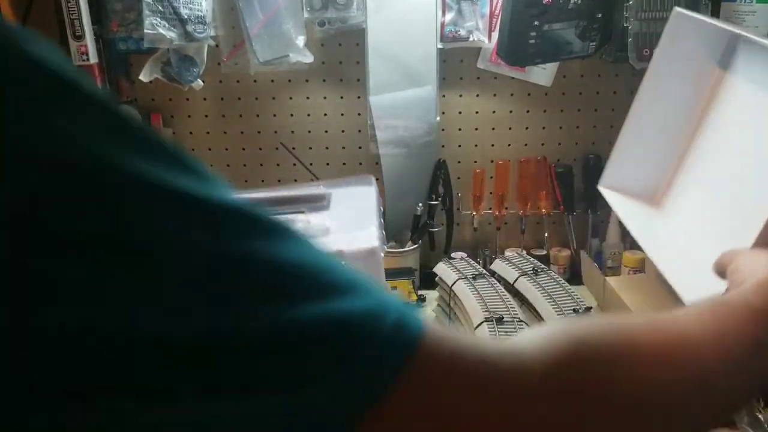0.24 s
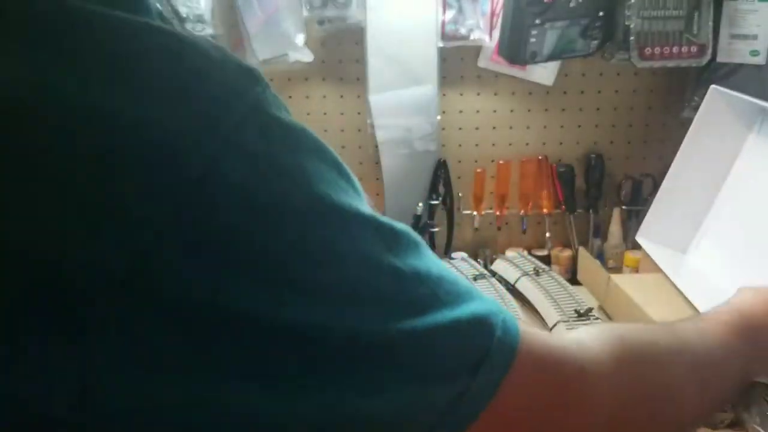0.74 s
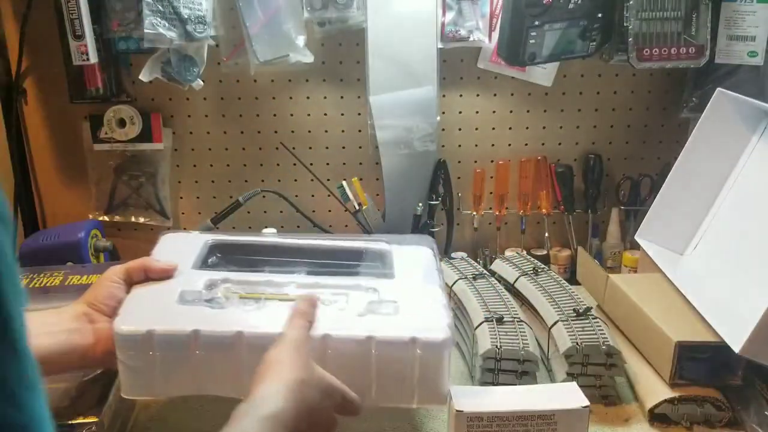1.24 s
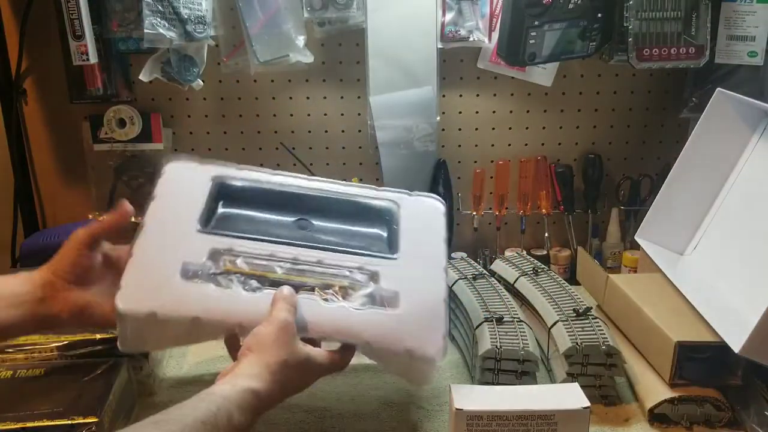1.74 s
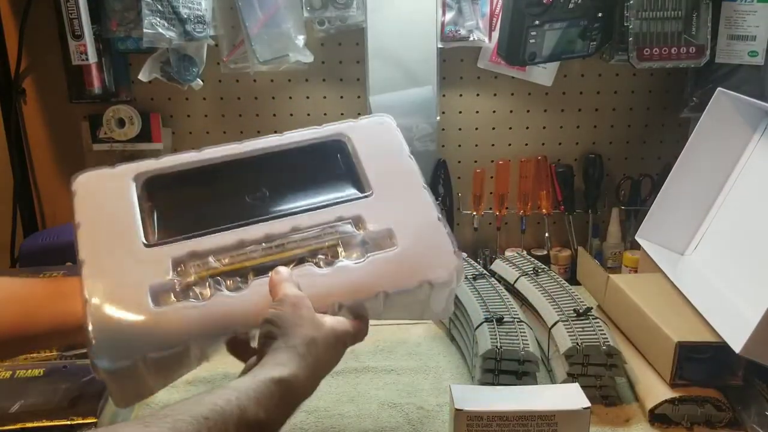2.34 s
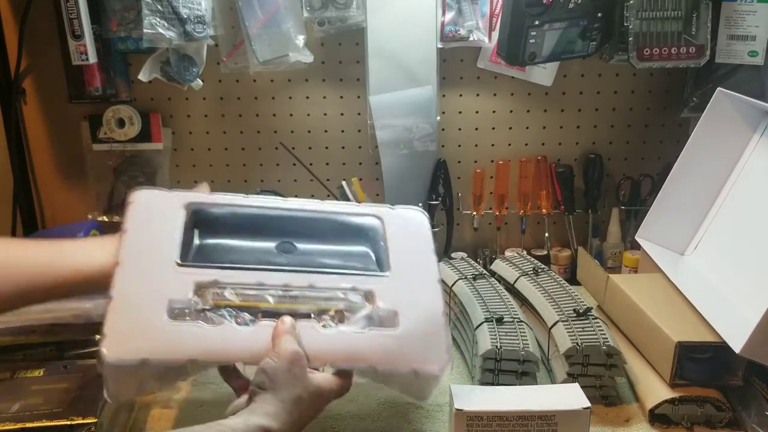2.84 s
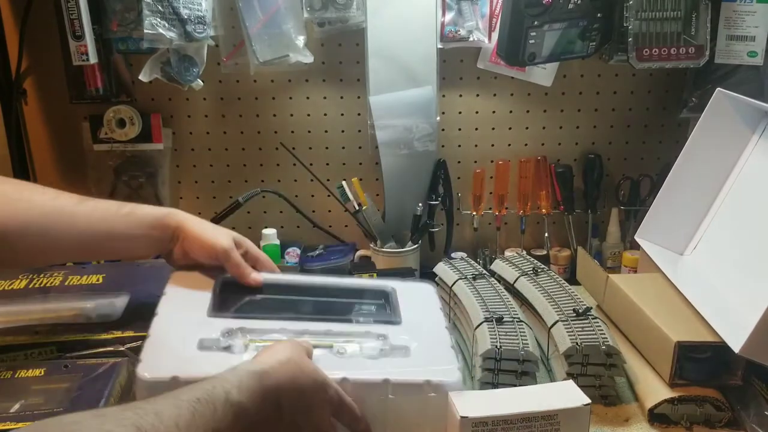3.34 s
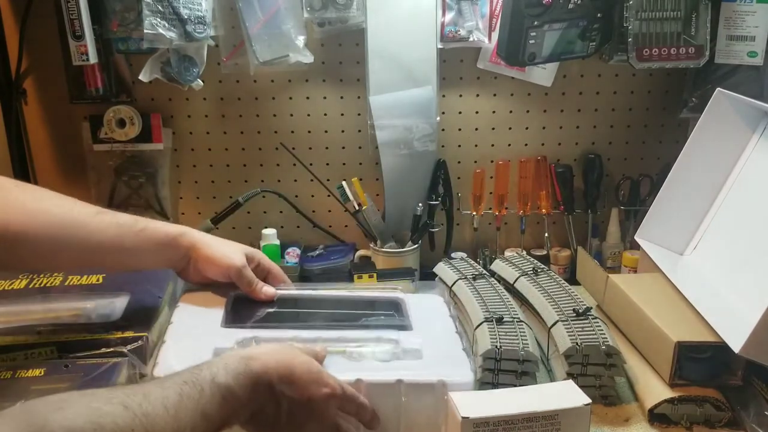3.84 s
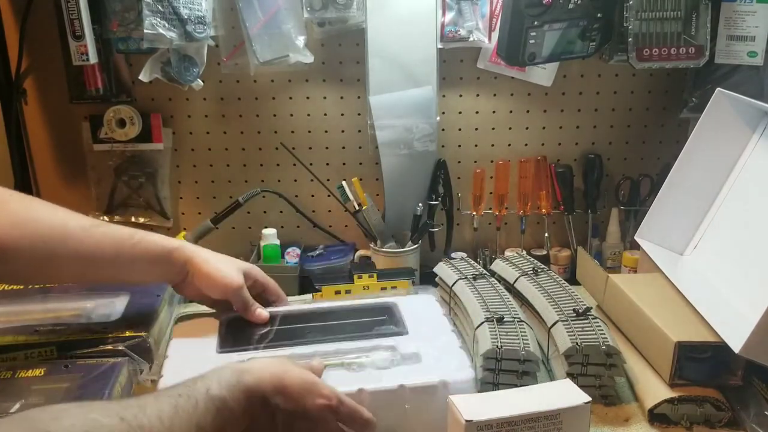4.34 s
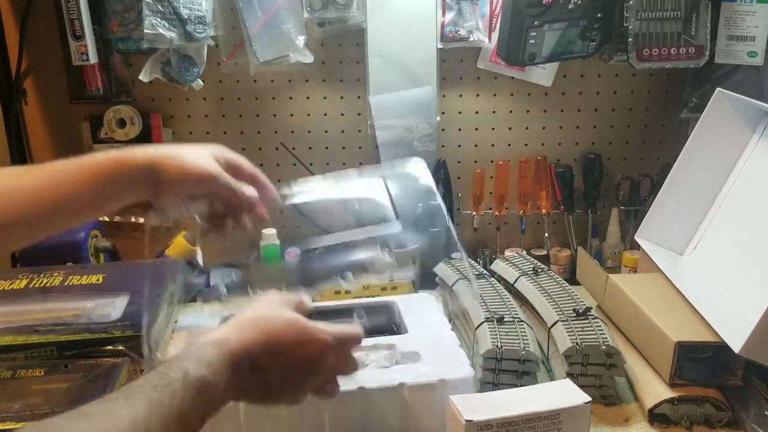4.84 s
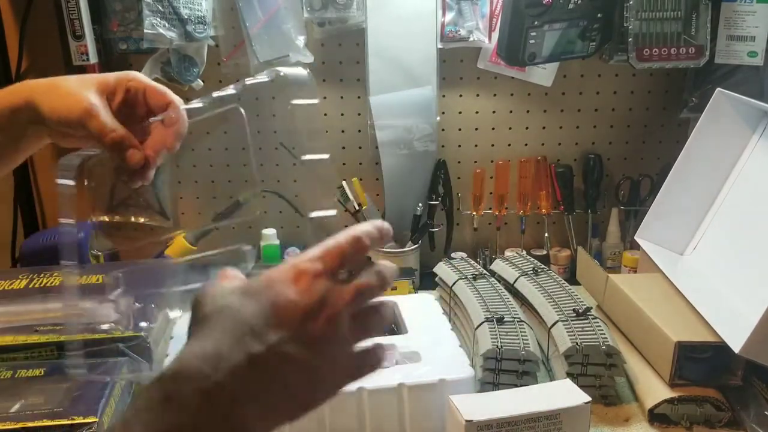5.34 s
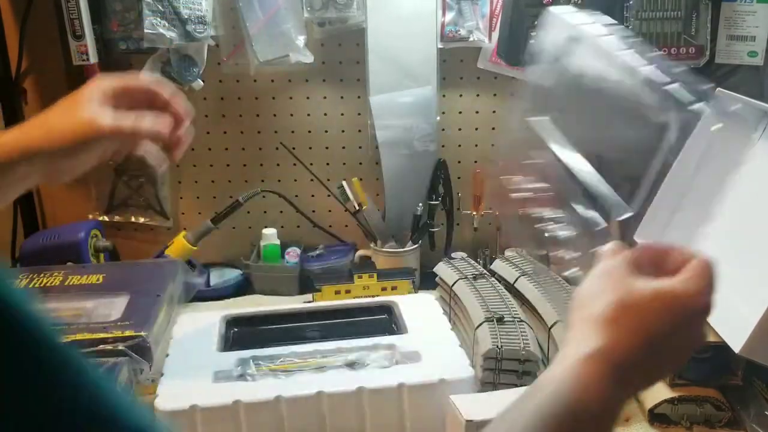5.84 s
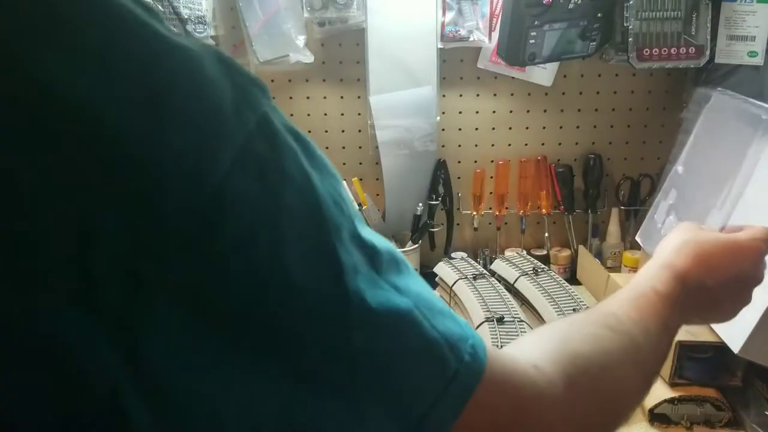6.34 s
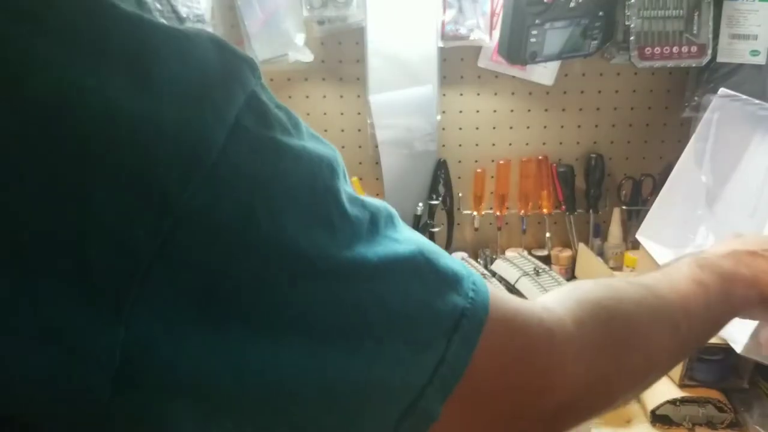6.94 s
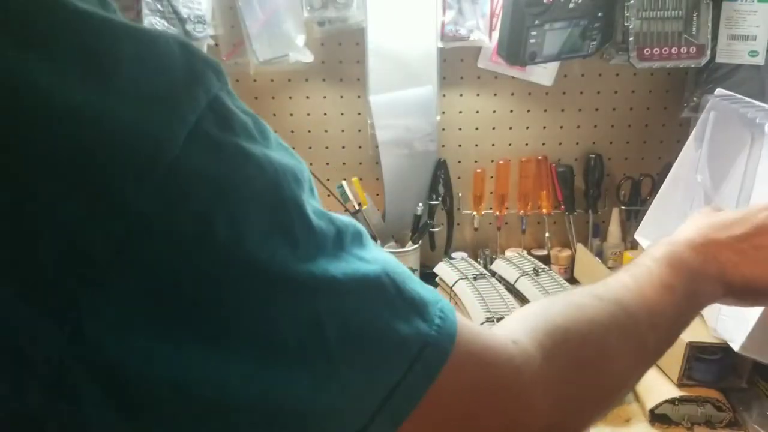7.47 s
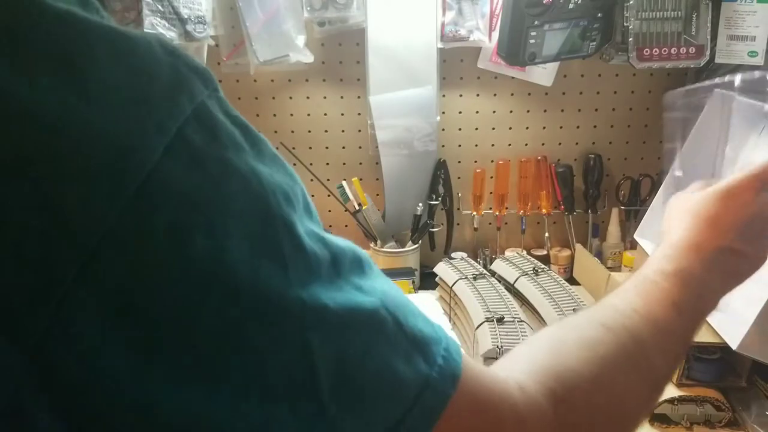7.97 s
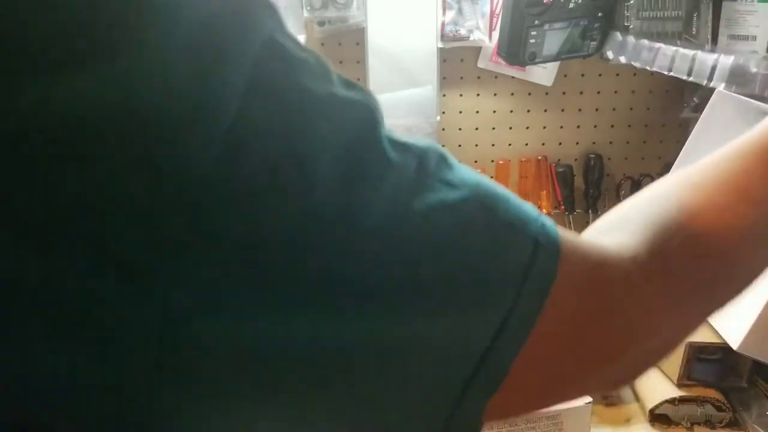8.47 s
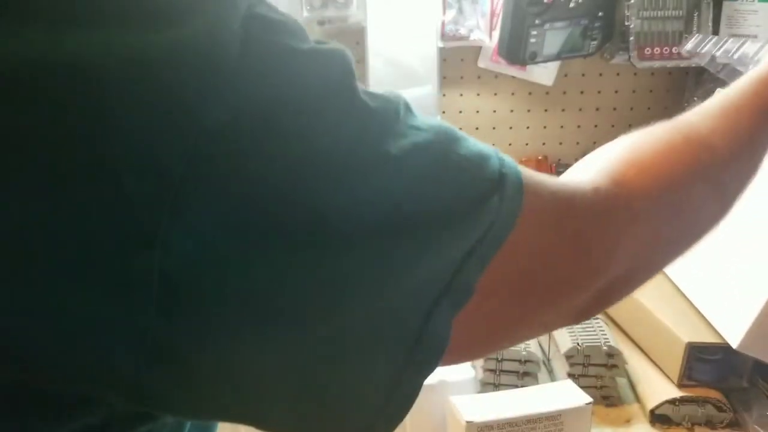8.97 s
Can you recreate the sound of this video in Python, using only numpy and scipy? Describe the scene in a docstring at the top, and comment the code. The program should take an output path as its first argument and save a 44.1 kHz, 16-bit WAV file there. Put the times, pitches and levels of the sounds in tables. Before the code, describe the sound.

A small workshop with steady low ventilation, faint hiss and motor hum, heard by two close microphones. Around 0.4-0.8 s come light plastic ticks, small knocks and a soft rub. Sparse clicks and scuffs follow from 1.2 s, with a loud, sharp plastic crack at about 1.9 s, then quiet handling. From 3.1 to 4.3 s foam and plastic rub in short strokes with clustered snaps, hollow bumps and a short lid ring near 3.5 s. A faint flick at 4.75 s precedes pops at 4.95 and crisp flexing at 5.4-5.5 s. At 6.1-6.9 s the sheet scrapes and pops with a box knock; it is nearly quiet until 7.7 s. Dense bright crackling with a tiny high squeak peaks at 7.8-8.05 s. From 8.45 s cardboard knocks dominate, heaviest at 8.6 s, with rubs, small squeaks near 9 s and final taps. Each sound gets a short echo.

```python
"""A small workshop with a low steady hum, where each handling sound gets a short echo.
On a bench, hands work the thin plastic lid off a foam tray and stow it in a cardboard box.
Sliding foam, plastic and sleeve are streams of tiny slips; squeaks are short unsteady tones.
Tray and box knock as decaying modes, the freed lid rings, and snaps are filtered noise flurries.
Two close microphones share the bass and differ in the treble."""
import sys
import numpy as np
from scipy import signal
from scipy.fft import rfft, irfft
from scipy.io import wavfile
from scipy.ndimage import uniform_filter1d, map_coordinates

SR = 44100
rng = np.random.default_rng(int(sys.argv[2]) if len(sys.argv) > 2 else 0)


def transcribe(signal):
    """Save signal, clipped to [-1, 1], as a 16-bit WAV file at the path in sys.argv[1]."""
    frames = np.atleast_2d(signal).T
    limited = np.clip(frames, -1, 1)
    pcm = np.round(limited * 32767).astype(np.int16)
    wavfile.write(sys.argv[1], SR, pcm)


N = 406161

# steady ventilation noise, spectral shape: f/Hz, relative density/dB
AIR_COLOUR = [(20, -27), (35, -5.5), (54, -2.5), (85, -8.5), (120, -6), (180, -5), (215, -12), (260, -11),
              (330, -14), (490, -16.5), (680, -25), (1000, -35), (5000, -42), (15500, -44)]
# hum of a motor in the room: f/Hz, rms level/dB
MOTOR_HUM = [(120, -68), (257, -80), (486, -73)]
# decay of the workshop: f/Hz, t60/s
ROOM_DECAY = [(100, 0.53), (320, 0.25), (840, 0.21), (2200, 0.23), (5800, 0.21), (14000, 0.19)]
# colour of the microphone pair: f/Hz, left minus right/dB
MIC_BALANCE = [(100, 1.3), (500, 4), (1200, 1.5), (2500, 5), (4500, 1), (7500, -5.5), (14000, -4)]
# stereo width: f/Hz, gain of the difference signal/dB
MIC_WIDTH = [(120, -15), (250, -12), (500, -6.5), (1000, -2), (2000, 0.5), (15000, 2.5)]
# where the hands work, box on the right or tray in the middle: t/s, delay of the left microphone/ms
HAND_PLACE = [(0.9, 0.2), (1.2, -0.047), (5.7, -0.074), (6.5, .14), (8.1, 0.15), (8.5, 0.17)]
# how the thin shell radiates: f/Hz, level/dB
SHELL_COLOUR = [(100, -35.5), (250, -9.5), (330, -7.5), (450, -2.5), (650, -5.5), (950, -7.5), (1500, -4),
                (2400, -4.5), (3400, -3), (5000, -10), (7000, -14.5), (8700, -24.5), (11500, -17.5),
                (15500, -23)]
# resonances of the tray's air pockets and walls: f/Hz, width/Hz, level/dB
TRAY_POCKETS = [(455.6, 17, 7.5), (555, 60, 1), (825, 13, 4.5), (1581, 82, 0), (2050, 210, -0.5),
                (2860, 260, 2), (3420, 80, 1)]
# colour of sliding foam and plastic: f/Hz, level/dB
SCUFF_COLOUR = [(300, -7.5), (800, -16), (1300, 3), (2500, 0.5), (3700, -1.5), (5000, -5), (7000, -9.5),
                (8700, -20), (11500, -11.5), (15500, -15.5)]
# colour of the hollow body under a stroke: f/Hz, level/dB
HOLLOW_COLOUR = [(60, -19.5), (170, 2.5), (300, -9.5), (450, -4), (800, -8), (1200, -12), (2500, -49.5),
                 (8000, -64.5)]
# strokes of lid, foam and sleeve, levels before the layer trims: t/s, held/s, scuff/dB, hollow body/dB
SLIDE_STROKES = [(0, 0.008, -59.5, -61.5), (0.462, 0.014, -53.5, -41.5), (0.53, 0.34, -73, -55),
                 (1.265, 0.14, -56, -54.5), (1.52, 0.11, -69.5, -65), (1.71, 0.33, -54.5, -56.5),
                 (2.02, 0.068, -75, -55.5), (2.12, 0.18, -64, -59.5), (2.44, 0.11, -64.5, -60),
                 (2.694, 0.019, -64, -57), (2.85, 0.16, -58.5, -55), (3.091, 0.48, -54, -49),
                 (3.157, 0.0089, -43, -45), (3.359, 0.013, -54, -43), (3.445, 0.019, -45, -36.5),
                 (3.56, .15, -54, -49.5), (3.848, 0.13, -45.5, -46.5), (4.01, 0.21, -70, -57),
                 (4.243, 0.057, -43.5, -37.5), (4.35, 0.1, -60, -53.5), (4.52, 0.24, -68, -58.5),
                 (4.88, 0.051, -63, -88), (5.018, 0.083, -55.5, -58.5), (5.408, 0.0093, -36, -48),
                 (5.489, 0.072, -49, -57), (6.12, 0.16, -59, -49.5), (6.319, 0.023, -46.5, -48),
                 (6.44, 0.22, -58.5, -53), (6.643, 0.018, -39.5, -40.5), (6.68, 0.091, -43.5, -45.5),
                 (6.82, 0.052, -57, -62), (6.94, 0.13, -63.5, -55.5), (7.727, 0.085, -56.5, -53.5),
                 (7.804, 0.015, -40, -37), (7.917, 0.044, -45, -41), (8.009, 0.059, -57, -43.5),
                 (8.491, 0.051, -51.5, -54), (8.62, .33, -56.5, -57), (8.88, 0.01, -51.5, -46.5),
                 (9.03, 0.076, -51.5, -45), (9.19, .02, -54, -45)]
# plastic sticking and slipping on plastic: t/s, rms level/dB, mean pitch f/Hz, length/ms
SQUEAK_EVENTS = [(7.055, -71.5, 8420, 27), (7.166, -71.5, 5850, 20), (7.901, -37, 8340, 8.6),
                 (8.96, -49, 5700, 7), (9.005, -54, 6060, 21)]
# modes of the box on the bench: f/Hz before the grip detunes them, level/dB, t60/s
BOX_MODES = [(96.5, -3.5, 0.21), (130, -11, 0.32), (175.7, -0.5, 0.16), (203, -1, 0.16), (266, -7, 0.13),
             (308, -7, 0.34), (355.8, -2, 0.072), (404, -12.5, 0.09), (500, -5.5, 0.1), (683, -2, 0.13),
             (787, -7, 0.079)]
# knocks of tray and box: t/s, energy before trim/dB, contact before softness scaling/ms, struck wall f/Hz
KNOCK_EVENTS = [(0.455, -13.5, 0.4, 319), (0.496, -14.5, 2.7, 272), (0.515, -15.5, 6, 131),
                (0.579, -21, 1.5, 285), (3.461, -16, 7.2, 107), (4.264, -9, 7.1, 58), (4.268, -5, 3.7, 197),
                (4.292, -14, 1.2, 177), (4.733, -22, 3.2, 179), (4.958, -14, 1.5, 219),
                (5.063, -22.5, 5.6, 159), (5.415, -19.5, 4, 187), (5.449, -13, 2.9, 69.4),
                (5.51, -11, 0.4, 368), (6.437, -2, 3.5, 239), (6.858, -12.5, 2.1, 239),
                (6.962, -18, 2.1, 173), (7.833, -16, 1.2, 315), (7.932, -16.5, 1.3, 170),
                (8.019, -12, 0.9, 473), (8.465, -10.5, 1.3, 296), (8.523, -8.5, 0.55, 256),
                (8.598, 9.5, 3, 151), (8.75, -5, 1.9, 167), (8.833, -3, 3.2, 308), (8.837, -6, 12, 68),
                (8.922, -10.5, 1.2, 372), (9.031, -7, 1.2, 152), (9.117, -11.5, 2, 161.8),
                (9.161, -7.5, 2.8, 313), (9.194, -9.5, 2, 234)]
# modes of the free lid: f/Hz, level before the contact mutes it/dB, t60/s
LID_MODES = [(1468, 15, 0.054), (1570, 14, 0.049), (2506, 10, 0.0922), (2700, -2.5, 0.09),
             (4940, 7.5, 0.055)]
# flicks of the freed lid: t/s, energy/dB, contact/ms
FLICK_EVENTS = [(3.461, -8, 1.5), (4.7511, -21, 0.14)]
# how far the panel that gave way stands out, weakest around 3 kHz: f/Hz, peak/dB
PANEL_PEAK = [(450, 9.5), (1500, 13), (3000, 6), (6000, 12)]
# snaps of lid and tray: t/s, 1-6 kHz energy before trim/dB, hollow body tilt/dB, crisp top tilt/dB,
# ringing panel f/Hz, length (half the time the main burst's shape takes to fall to 1/e)/ms
SNAP_EVENTS = [(0.439, -26, 10, 10, 406, 2.5), (0.4924, -18, 0.5, 3, 850, 1.8),
               (0.5143, -15.5, 2, 2, 4100, 1.9), (0.5528, -13.5, 6.5, -11, 2700, 6.8),
               (0.6201, -22.5, -21, 1.5, 6140, 1.1), (0.6573, -15.5, -5, 12, 5210, 2),
               (0.684, -20.5, -22, 14.5, 6200, 2), (0.7812, -21, 7, -28, 1330, 2.8),
               (1.033, -42, 16, -12, 2180, 4.3), (1.2484, -24, 15, -21, 1320, 1.7),
               (1.325, -23.5, 5, 15.5, 13600, 2.7), (1.386, -18, 13, -1, 1400, 4.6),
               (1.4637, -18, 6, -5, 477, 4.7), (1.6741, -15.5, 7.5, 11, 1030, 3.2),
               (1.77, -6, 6.5, 1.5, 3700, 4.7), (1.8503, -20.5, -17, 10, 5070, 1.3),
               (1.8868, 12.5, -7, 2.5, 2310, 5), (2.1004, -24, -2, 4.5, 3220, 1.7),
               (2.176, -21.5, 3, 1.5, 4200, 2), (2.304, -30, 13.5, -7, 466, 3),
               (2.3682, -18.5, 9, 2.5, 820, 3.9), (2.465, -32, 15.5, -8.5, 440, 5.2),
               (2.678, -31, 27, -23, 1340, 3.7), (2.796, -15.5, -6.5, 8, 5200, 13),
               (2.812, -20, 8, 9, 1330, 11), (2.8907, -24.5, -12, 16, 1010, 2.3),
               (3.159, -1.5, 10.5, 3, 1530, 5.8), (3.198, -8, 13, -0.5, 1970, 7.3),
               (3.303, -16.5, -7, -2, 2380, 1.4), (3.3129, -6, 1, 8, 2530, 3.6),
               (3.361, -15, 5.5, 14, 450, 5.3), (3.448, -3, -16, 4, 1660, 6.5),
               (3.4574, 4, 2.5, 5, 1540, 2.6), (3.539, -9.5, 5, 10.5, 5530, 1.4),
               (3.644, -14.5, 4.5, 9, 6750, 2.5), (3.9117, -17, -5, 13.5, 426, 5.1),
               (3.931, -9.5, 6.5, 5, 497, 17), (3.974, -13, 7, 1, 1850, 8), (4.0457, -21, 6, 3, 440, 1.3),
               (4.198, -9.5, 4.5, -3, 1220, 8.8), (4.2291, -6.5, -5, 4.5, 2480, 2),
               (4.4355, -27, 6, 5, 970, 2.9), (4.562, -32, 17, -6, 418, 2.6),
               (4.7517, -23, -13, 5, 2590, 0.81), (4.949, -10, 5.5, -4, 2340, 3.6),
               (4.956, -4, -3, 4, 2260, 2.4), (5.1972, -24.5, -2, 2.5, 2470, 0.4),
               (5.383, -13, 2, 2.5, 3960, 2.1), (5.401, -3.5, -9, 1.5, 1310, 9.3),
               (5.484, -9, 0, -11, 2220, 6.1), (5.5105, -1.5, 2.5, 1, 592, 3.7),
               (6.097, -16.5, 13, -1.5, 483, 6.4), (6.177, -17, 10.5, -9, 880, 3.4),
               (6.2092, -14, 4.5, -4, 530, 2.9), (6.2972, -20, 11, -8, 6170, 3.5),
               (6.3585, -0.5, 10, 3.5, 2100, 3.7), (6.6721, -7, -11, 2.5, 2050, 9),
               (6.692, -4.5, 0.5, -21, 770, 6.3), (6.749, -10, 7.5, 0, 557, 14),
               (6.842, -17, -15, 2, 3000, 7.7), (6.9086, -15, 11.5, 3, 810, 3.1),
               (7.209, -36.5, 24, 1, 837, 2.8), (7.7207, -23.5, 20.5, -8.5, 744, 2.8),
               (7.764, -22, 14, -8.5, 700, 1.5), (7.7883, -12, 4.5, 9, 700, 2.9),
               (7.822, -6.5, 8.5, 7, 760, 3.1), (7.8316, 0.5, -8, -4, 3900, 1.8),
               (7.907, -5, -27, 4.5, 10800, 11), (7.929, 10, -11, 5, 2650, 3.3),
               (7.986, -8, 5, 2, 4530, 1.3), (8.0197, 7, -6, 7, 5360, 4.4), (8.053, 3, -1.5, 6.5, 4250, 3),
               (8.4661, -7.5, 6.5, -3, 392, 0.68), (8.5977, -1, 13, -3, 357, 1.85),
               (8.7526, -16.5, 11.5, 7.5, 389, 2.9), (8.8326, -8, 5.5, 2, 375, 3.7),
               (9.012, -14.5, -5, 8, 403, 3.1), (9.1202, -19, 6, 13, 7060, 2.7),
               (9.1611, -8.5, 8.5, 1, 383, 2.3)]

AIR_DB = -60.5  # rms of each noise stream before the streams are summed
EDGE_HZ = 16100  # upper band limit
TAPS = 4096  # length of filters and snaps, in samples
HZ = np.fft.rfftfreq(TAPS, 1 / SR)
GRIP_DB_PER_S = 743.5  # a stroke builds quickly as the surfaces catch
SAG_DB_PER_S = 5  # it eases while they slide
RELEASE_DB_PER_S = 288.5  # and dies as the hand lets go
CRINKLES_PER_S, CRINKLE_SIZE_DB = 45, 5  # ticks of the flexing sheet; dB per unit of random size
WALL_DB, WALL_T60_S = 10.5, 0.092  # the struck wall's own ring, next to the modes of the whole box


def gain(db):
    """Turns decibels into gain."""
    return 10 ** (np.asarray(db) / 20)


def unit_rms(x):
    """Scales a sound to rms 1."""
    return x / np.sqrt(np.mean(x ** 2) + 1e-20)


def curve(points, hz):
    """Joins (f/Hz, value) points on a log-frequency axis."""
    f, value = np.transpose(points)
    return np.interp(np.log(hz + 1), np.log(f + 1), value)


def decay(t, t60):
    """Exponential fade that loses 60 dB in t60."""
    return np.exp(-np.log(1000) * t / t60)


def add(mix, s, sound):
    """Lays a sound into the mix at time s."""
    part = mix[:, max(round(s * SR), 0):][:, :sound.shape[-1]]
    part += sound[..., :part.shape[1]]


def causal(db):
    """Spectrum of the tightest causal (minimum-phase) response with this dB curve."""
    log_gain = np.r_[db, db[-2:0:-1]] * np.log(10) / 20
    return np.exp(np.conj(signal.hilbert(log_gain)))[:len(db)]


def coloured(x, db):
    """Filters each channel by a dB curve."""
    response = irfft(causal(db))[None]
    return signal.oaconvolve(x, response, axes=1)[:, :x.shape[1]]


def bump(hz, width):
    """Shape of one resonance, height 1."""
    return 1 / (1 + (2 * (HZ - hz) / width) ** 2)


def peak_db(hz, width, db):
    """One resonance standing db above its surroundings."""
    return 10 * np.log10(1 + (gain(max(db, 0)) ** 2 - 1) * bump(hz, width))


def pockets():
    """Resonances of the tray's air pockets and walls, in dB."""
    return sum(db * bump(hz, width) for hz, width, db in TRAY_POCKETS)


def drift(count):
    """Slow random motion of rms 1, smoothed twice over count samples."""
    once = uniform_filter1d(rng.standard_normal(N), count)
    return unit_rms(uniform_filter1d(once, count))


def background(waver=.004):
    """Low ventilation noise, faint hiss and the motor's hum with a wavering pitch."""
    air = gain(AIR_DB) * unit_rms(coloured(rng.standard_normal((3, N)), curve(AIR_COLOUR, HZ)))
    hum = np.zeros(N)
    for hz, db in MOTOR_HUM:
        pitch = hz * (1 + waver * drift(count=2500))
        hum += gain(db) * unit_rms(np.sin(2 * np.pi * np.cumsum(pitch) / SR))
    return air[:2] + .5 * air[2] + hum  # the third stream is common to both channels


def room(x, wet_db=-3, build_s=0.0023):
    """Sparse reflections from bench and walls, each band dying at its own speed."""
    taps, grid = np.zeros((2, SR // 2)), np.arange(130, SR // 2 - 20, 10)
    at = grid + rng.integers(0, 10, (2, len(grid)))
    np.put_along_axis(taps, at, rng.choice([-1., 1.], at.shape), 1)
    hz, t, z = signal.stft(taps, SR, nperseg=256)
    z = z * decay(t, curve(ROOM_DECAY, hz)[:, None]) * (1 - np.exp(-t / build_s))
    tail = signal.istft(z, SR)[1]
    return gain(wet_db) * signal.fftconvolve(x, tail / np.linalg.norm(tail[0]), axes=1)[:, :N]


def pressure():
    """Gains of scuff and hollow body over time: every stroke catches, slides and lets go."""
    t, power = np.arange(0, N, 32) / SR, 0
    for s, held, scuff_db, body_db in SLIDE_STROKES:
        grip_db = GRIP_DB_PER_S * np.minimum(t - s, 0)
        sag_db = SAG_DB_PER_S * np.clip(t - s, 0, held)
        release_db = RELEASE_DB_PER_S * np.maximum(t - s - held, 0)
        shape_db = np.maximum(grip_db - sag_db - release_db, -100)
        power = power + gain(shape_db + [[scuff_db], [body_db]]) ** 2
    return [np.interp(np.arange(N) / SR, t, np.sqrt(p)) for p in power]


def slips(per_s, size_db, count=18):
    """Tiny slips of uneven size, each ringing one small patch of the sheet for a few cycles."""
    out = np.zeros((2, N))
    for hz in np.geomspace(300, 15000, count):
        at = rng.integers(0, N, 9000)  # candidates, thinned to per_s on average at each pitch
        happens = rng.random(len(at)) < per_s * N / SR / len(at)
        size = gain(size_db * np.minimum(rng.exponential(1, len(at)), 3))
        train = np.zeros((2, N))
        train[:, at] = happens * size * rng.standard_normal((2, len(at)))
        out += signal.lfilter(*signal.iirpeak(hz, 4, fs=SR), train)
    return unit_rms(out)


def wandering(x):
    """The contact point moves, so resonances swell and fade in patches of time and frequency."""
    z = signal.stft(x, SR, nperseg=512, noverlap=384)[2]
    patches = uniform_filter1d(rng.standard_normal(z.shape[1:]), size=3, axis=0)
    patches = unit_rms(uniform_filter1d(patches, size=10, axis=1))
    return signal.istft(z * gain(2.5 * patches), SR, nperseg=512, noverlap=384)[1][:, :N]


def crinkles(level_db=-6, ring_ms=3.5):
    """The sheet ticks at random as it flexes: tiny snaps with the colour of the shell."""
    size = gain(CRINKLE_SIZE_DB * np.minimum(rng.exponential(1, N), 3))
    ticks = size * (rng.random(N) < CRINKLES_PER_S / SR)
    envelope = signal.lfilter([1], [1, -np.exp(-1000 / (ring_ms * SR))], ticks)
    noise = envelope * rng.standard_normal((2, N))
    return gain(level_db) * unit_rms(coloured(noise, curve(SHELL_COLOUR, HZ) + pockets()))


def rubs(scuff_db=-3, hollow_db=-3, slips_per_s=230, size_db=2.5, smooth=0.41):
    """Foam, plastic and cloth slide: clumped slips heard through the sheet and the hollow tray."""
    scuff_gain, body_gain = pressure()
    friction = slips(slips_per_s, size_db) + smooth * rng.standard_normal((2, N))
    friction = wandering(friction * gain(1.5 * drift(count=200)))  # the drift makes the clumps
    scuff = unit_rms(coloured(friction, curve(SCUFF_COLOUR, HZ) + pockets()))
    hollow = unit_rms(coloured(friction, curve(HOLLOW_COLOUR, HZ) + pockets()))
    sliding = gain(scuff_db) * scuff_gain * scuff + gain(hollow_db) * body_gain * hollow
    return sliding + scuff_gain * crinkles()


def squeaks(jitter=.035):
    """Plastic sticks and slips on plastic: short tones with an unsteady pitch."""
    out, wobble = np.zeros((2, N)), drift(count=25)
    for s, db, hz, length_ms in SQUEAK_EVENTS:
        span = wobble[round(s * SR):][:round(length_ms * SR / 1000)]
        tone = np.sin(2 * np.pi * np.cumsum(hz * (1 + jitter * span)) / SR)
        add(out, s, gain(db) * unit_rms(tone * np.hanning(len(tone))))
    return out


def knocks(level_db=-1, spread=0.027, softness=0.12):
    """A soft push rings the box; a longer contact leaves only the low modes."""
    out, t = np.zeros((2, N)), np.arange(SR // 3) / SR
    hz, mode_db, t60 = np.transpose(BOX_MODES)[:, :, None]
    for s, db, contact_ms, wall_hz in KNOCK_EVENTS:
        detune = 1 + spread * rng.uniform(-2.1, 1, hz.shape)  # the grip shifts the modes
        ring = np.sum(gain(mode_db) * decay(t, t60) * np.cos(2 * np.pi * hz * detune * t), axis=0)
        ring += gain(WALL_DB - 60 * t / WALL_T60_S) * np.cos(2 * np.pi * wall_hz * t)
        u = t * 1000 / (softness * contact_ms)
        push = u * np.exp(-u)
        thud = signal.fftconvolve(ring, push)[:len(t)]
        add(out, s, gain(db + level_db) * thud / np.linalg.norm(thud))
    return out


def flicks():
    """The freed lid's few modes ring out; a longer contact mutes the high ones."""
    out, t = np.zeros((2, N)), np.arange(SR // 4) / SR
    hz, mode_db, t60 = np.transpose(LID_MODES)[:, :, None]
    for s, db, contact_ms in FLICK_EVENTS:
        strength = gain(mode_db) / (1 + (2 * hz * contact_ms / 1000) ** 2)
        phase = rng.uniform(-1.4, 1, (2, len(LID_MODES), 1))
        ring = np.sum(strength * decay(t, t60) * np.sin(2 * np.pi * hz * t + phase), axis=1)
        add(out, s, gain(db) * ring / np.linalg.norm(ring[0]))
    return out


def snaps(level_db=-2.5, rise_ms=2.0, shared=0.22, ring_db=-18, ring_ms=14):
    """The shell buckles: a flurry of bending waves, coloured by the tray and the panel that gave way."""
    out, ms = np.zeros((2, N)), np.arange(TAPS) * 1000 / SR
    band = (HZ > 1000) & (HZ < 6000)  # where the energy is set
    shell_db = curve(SHELL_COLOUR, HZ) + pockets()
    for s, db, body_db, top_db, panel_hz, length in SNAP_EVENTS:
        waves = rng.standard_normal((3, TAPS))
        stereo = np.sqrt(shared) * waves[2] + np.sqrt(1 - shared) * waves[:2]
        burst = np.exp(-(ms / (2 * length)) ** 2) + gain(ring_db) * np.exp(-ms / ring_ms)
        z = rfft((1 - np.exp(-ms / rise_ms)) * burst * stereo)
        # evens out the noise burst's random spectrum, so that the colour curves set the snap's sound
        z /= np.sqrt(uniform_filter1d(abs(z) ** 2, size=70))
        tilt_db = curve([(680, body_db), (1800, 0), (4500, 0), (11000, top_db)], HZ)
        ringing_db = peak_db(panel_hz, 45 + .055 * panel_hz, curve(PANEL_PEAK, panel_hz))
        # every grip brings out a few other modes of the sheet
        grip_hz = np.geomspace(600, 5000, 7) * rng.uniform(.83, 1.2, 7)
        ringing_db += sum(peak_db(hz, 45, 6) for hz in grip_hz)
        z *= causal(shell_db + tilt_db + ringing_db)
        energy = np.mean(np.sum(abs(z[:, band]) ** 2, axis=1)) * 2 / TAPS
        add(out, s, gain(db + level_db) * irfft(z) / np.sqrt(energy))
    return out


def narrowed(x):
    """Two close microphones share the bass and differ in the treble."""
    mid = x.mean(axis=0)
    side = coloured((x[:1] - x[1:]) / 2, curve(MIC_WIDTH, HZ))[0]
    return np.array([mid + side, mid - side])


def placed(x):
    """Sound from one side reaches the far microphone a little later, so the left channel shifts."""
    sample = np.arange(N)
    late = np.interp(sample / SR, *np.transpose(HAND_PLACE)) * SR / 1000
    return np.array([map_coordinates(x[0], [sample - late], order=5), x[1]])


def scene(thud_room_db=-7, lowest_hz=85):
    """Handling sounds, their echo in the workshop, and the background."""
    shell = snaps() + rubs() + flicks() + squeaks()
    # keeps the lowest rumble out of the knocks
    high_pass = signal.butter(2, lowest_hz, "high", fs=SR, output="sos")
    thuds = signal.sosfilt(high_pass, knocks())
    echo = room(shell + gain(thud_room_db) * thuds)
    return placed(narrowed(shell + thuds + echo)) + narrowed(background())


def record(dry):
    """The two microphone ports differ in colour at constant summed power; then the band limit."""
    lean = gain(curve(MIC_BALANCE, np.fft.rfftfreq(2 * N, 1 / SR)))
    ports = np.array([lean, np.ones_like(lean)]) * np.sqrt(2 / (1 + lean ** 2))
    pair = irfft(rfft(dry, 2 * N) * ports)[:, :N]
    low_pass = signal.firwin(401, EDGE_HZ, window=("kaiser", 8), fs=SR)
    return signal.oaconvolve(pair, low_pass[None], "same")


dry = scene()
out = record(dry)
transcribe(out)
```